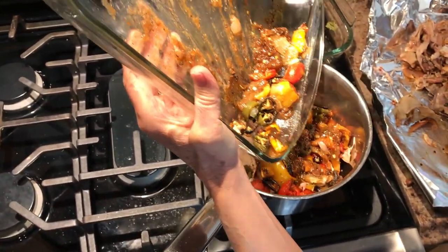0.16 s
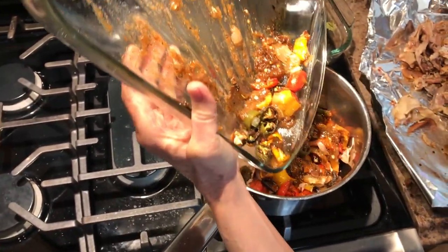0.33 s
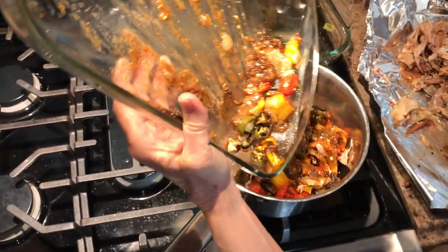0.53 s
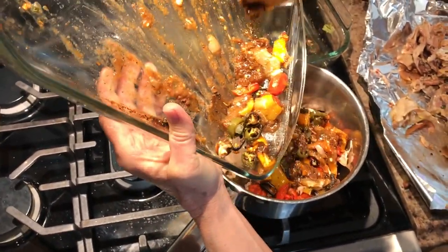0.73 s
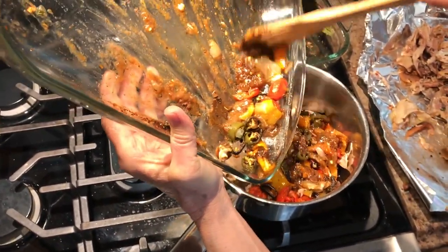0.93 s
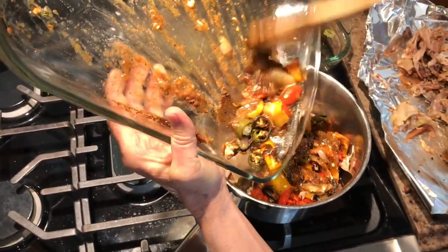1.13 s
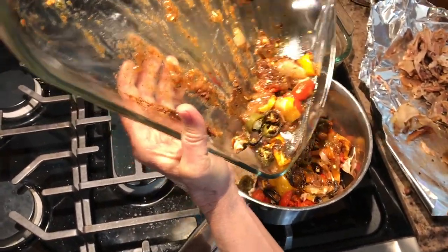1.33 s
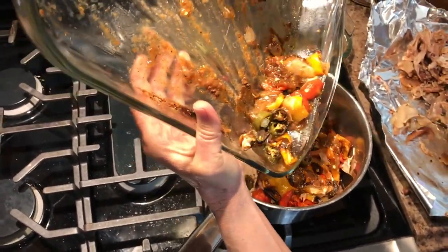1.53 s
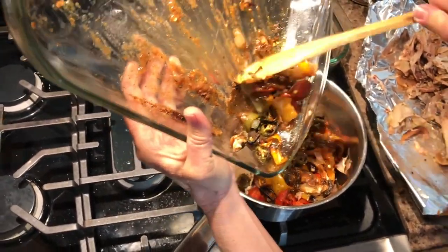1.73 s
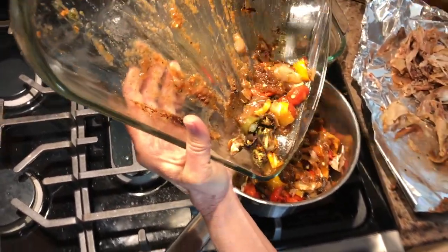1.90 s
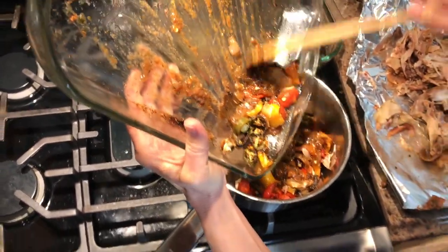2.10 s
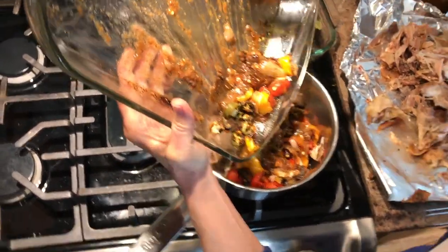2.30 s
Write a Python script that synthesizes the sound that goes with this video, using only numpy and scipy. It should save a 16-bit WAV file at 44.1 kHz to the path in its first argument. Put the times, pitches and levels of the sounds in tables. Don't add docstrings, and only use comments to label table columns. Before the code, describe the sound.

Wooden spoon scraping a glass dish, with three ringing knocks and sticky wet smears in a quiet kitchen

```python
import sys
import numpy as np
from scipy import signal
from scipy.fft import rfft, irfft, next_fast_len
from scipy.io import wavfile
from scipy.ndimage import uniform_filter1d

SR = 44100
rng = np.random.default_rng(int(sys.argv[2]) if len(sys.argv) > 2 else 0)


def int16_out(signal):
    q = np.round(np.clip(np.atleast_2d(signal).T, -1, 1) * 32767)
    wavfile.write(sys.argv[1], SR, q.astype(np.int16))


def boost_factor(decibels):
    exponent = np.asarray(decibels, float) / 20
    return 10 ** exponent


N = 103635

# pitch_hz, density_db (per Hz)
AIR = [(25, -34), (50, 1.5), (90, -12), (300, -15.5), (800, -18), (3000, -32), (10000, -40), (16000, -38)]
AIR_DB = -68
ROOM_T60_S, ROOM_DB, WALL_CUT_HZ = .3, -22, 4000

# pitch_hz, level_db
MIC = [(60, -1), (4500, -0.5), (5000, 0), (9000, -0.5), (10600, -3), (12500, 1.5), (15000, 4)]
NEAR_LOW_HZ = 134
TOP_HZ, TOP_DB = 15650, -25

# start_s, length_s, level_db, centre_hz
SMEARS = [(0.003, 0.012, -64, 11000), (1.505, .12, -72, 7000), (1.625, .04, -70, 7000),
          (0.31, 0.013, -58, 9000), (.39, 0.04, -64.5, 8800), (0.48, 0.021, -51.5, 11900),
          (0.532, 0.03, -64, 12600), (0.572, 0.056, -73.5, 10700), (0.632, 0.061, -61, 9000),
          (0.748, 0.028, -61.5, 8000), (0.913, 0.058, -62, 5960), (0.991, 0.044, -66.5, 9800),
          (1.014, 0.0098, -52, 11100), (1.02, 0.053, -88, 8850), (1.08, 0.04, -66, 5900),
          (1.124, 0.015, -83, 10000), (1.19, 0.016, -74, 10000), (1.222, 0.031, -72.5, 11100),
          (1.66, 0.046, -65, 8000), (1.755, 0.065, -72, 7040), (2.112, 0.063, -69.5, 8050),
          (2.175, 0.04, -61, 5030), (2.232, 0.013, -70, 9900), (2.282, 0.014, -67, 7040)]
SMEAR_EDGE_S, SMEAR_TAIL, SMEAR_WIDTH_OCTAVES = .0015, 0.27, 1.3
SMEAR_GRAINS_PER_S, SMEAR_SPREAD_DB, SMEAR_CYCLES = 6400, 2.2, 30
# start_s, peak_db, pitch_hz
POPS = [(.003, -40, 9500), (.0223, -54, 13500), (.398, -52, 8700), (.428, -58, 7000), (.6025, -54, 6300),
        (.84, -58, 11700), (1.045, -56, 13000), (1.058, -56, 4000), (1.149, -51, 13500), (1.129, -56, 8400),
        (1.222, -53, 8500), (1.248, -53, 13500), (1.2865, -59, 7000), (1.4057, -64, 3010),
        (1.7604, -52, 4200), (1.779, -52, 4000), (1.8931, -62, 14500), (1.9215, -59, 11500),
        (2.0403, -63, 12300), (2.1161, -55, 3500), (1.106, -52, 9000), (1.2, -48, 10000),
        (.314, -61, 13000), (.5372, -48, 14100), (.5432, -43, 14300), (.569, -59, 13100), (.635, -57, 8800),
        (0.652, -60, 10330), (0.735, -64, 8900), (0.764, -41, 4380), (.786, -44.5, 14600),
        (0.9328, -39, 3460), (1.006, -52, 8000), (1.071, -47, 6200), (1.074, -43, 5700), (1.078, -45, 5650),
        (1.106, -42, 5700), (1.124, -43.5, 12000), (1.14, -48, 9730), (1.189, -45, 12000),
        (1.2, -45.5, 7450), (1.227, -46.5, 9400), (1.239, -55, 4500), (1.6626, -44, 4400),
        (1.799, -48.5, 15000), (2.195, -45, 7000), (2.2222, -45.5, 11500), (2.281, -40, 5340),
        (2.286, -44.5, 4000), (2.2927, -43, 7700), (2.299, -44.5, 14400)]
POP_T60_S, POP_WIDTH_OCTAVES = .0055, 0.37
THREAD_PITCHES, THREAD_HISS_DB, CLUMP_S, CLUMP_DB = 16, -5, 0.0098, 3.5

# start_s, level_db
BUMPS = [
    (.9145, -50),
    (0.758, -54),
    (.487, -55.5),
    (1.018, -58),
    (.69, -58),
    (.935, -50),
    (.655, -55),
    (1.56, -58),
    (2.19, -52),
    (.303, -52),
]
BUMP_HZ, BUMP_T60_S = 222, 0.042

# start_s, peak_s, end_s, level_db, pitch_hz
SINGS = [(.57, .595, .64, -68, 1034), (.63, .685, .76, -56, 1034), (.755, .772, .87, -55, 1034),
         (1.783, 1.802, 1.93, -54.5, 1030), (2.172, 2.187, 2.205, -57, 740), (1.66, 1.72, 1.82, -62, 755),
         (1.635, 1.66, 1.7, -58, 2270), (1.785, 1.81, 1.85, -62, 2110), (1.68, 1.705, 1.74, -62, 2960),
         (1.58, 1.63, 1.66, -63, 1034), (2.08, 2.14, 2.165, -54, 1030), (2.11, 2.152, 2.17, -54, 1625),
         (2.09, 2.115, 2.145, -55, 725), (2.24, 2.26, 2.3, -65, 740), (.93, .945, .975, -58, 1497),
         (.3, .36, .47, -66, 1600), (.605, .615, .64, -62, 2060), (.752, .766, .782, -58, 4380),
         (1.625, 1.68, 1.8, -57, 1580), (1.65, 1.664, 1.69, -59, 4400), (1.77, 1.785, 1.815, -65, 5600),
         (.57, .59, .68, -68, 2768)]
SING_WAVER_DB, SING_WAVER_S = 2.2, .008

# start_s, peak_s, end_s, level_db, rasp_centre_hz
DRAGS = [(0.26, 0.307, 0.4, -58.5, 455), (0.34, 0.398, 0.533, -66, 1460), (0.46, .49, 0.64, -63, 1208),
         (0.547, 0.626, 0.61, -57.5, 2280), (0.598, 0.654, 0.77, -57.5, 1110),
         (0.746, 0.756, .79, -52.5, 1200), (.911, 0.914, 0.95, -56, 686), (0.934, 0.934, 0.99, -55.5, 1200),
         (1.012, 1.016, 1.05, -57, 1400), (1.028, 1.077, 1.158, -67, 1530), (1.415, 1.494, 1.84, -69, 920),
         (1.5, 1.61, 1.59, -69, 710), (1.585, 1.66, 1.916, -54, 1850), (1.76, 1.784, 1.88, -64, 1900),
         (2.05, 2.17, 2.215, -56, 1100), (2.17, 2.225, 2.31, -64, 1100)]
DRAG_MODE_DB = [-17, -14.5, -14.5, -5.5, -7, -7.5, -10, -10, -7, -6, -8, -14, -14, -10.5]
SLIPS_PER_S, SLIP_SPREAD_DB, RASP_CYCLES, RASP_WIDTH_OCTAVES = 14000, 2, 34, 1.27
DRAG_DAMPING, DRAG_RING_DB = 0.47, 2.5
DRAG_RING_FALL_DB = 4.1

DISH_HZ = [243, 345, 519, 738, 765, 1034, 1497, 1552, 1627, 2270, 2768, 2960, 3255, 4343]
# t60_s, spot_1_db, spot_2_db, spot_3_db
DISH = [(0.16, -28, -23, -23), (0.041, -19, -14.5, -7.5), (0.053, -17.5, -18.5, -15),
        (0.12, -18, -16.5, -7), (0.049, -15, -14.5, 0.1), (0.16, 0.5, -3, -7), (0.058, -10, -21, -19),
        (0.15, -12.5, -21, -27), (0.11, -15.5, -12, -7), (0.1, -19.5, -17.5, -14),
        (0.095, -28.5, -18, -32.5), (0.06, -24, -10, -25), (0.058, -20, -20, -25), (0.054, -47, -13.5, -35)]
SPOT_RING = [
    1.01,
    .75,
    .55,
]
TWIN_DB, TWIN_LONGER, TWIN_HZ = -21.5, 3.8, 6
# pitch_hz, t60_s, spot_1_db, spot_2_db, spot_3_db
SPOON = [(196, 0.04, -13, -14, -12), (1195, 0.013, -26, -4.5, -16), (1078.4, 0.046, -2, -8, -13),
         (391, 0.023, -9.5, -9.5, -11.5), (626, 0.027, -15, -7.5, -11), (1755, 0.044, -22, -10, -30),
         (2180, 0.033, -18, -12.5, -25), (3760, .028, -33, -10.5, -27), (5630, 0.063, -38, -1.5, -32),
         (6730, 0.0099, -38, -3, -31), (3025, .04, -24, -30, -30), (850, .03, -18, -20, -14)]
# level_db, t60_s, centre_hz
CRACKS = [
    (-27, 0.089, 3300),
    (0, 0.027, 2640),
    (-28, 0.017, 6400),
]
# start_s, level_db, softness_cut_hz, thud_db
KNOCKS = [(0.2302, -25, 3260, 5), (.2336, -22.5, 2450, -13), (.6671, -56, 2000, .1),
          (0.6545, -58, 2000, .1), (.7551, -58, 2500, 7), (.7625, -61, 2500, 5), (1.7979, -62, 1360, -6),
          (1.4963, -36.5, 9100, .1), (1.4978, -35, 7000, .1), (.9331, -57, 6000, .1),
          (2.0677, -48, 2030, .1), (2.0688, -27, 2290, 1.5)]
KNOCK_SPOT = [0, 0, 2, 2, 2, 2, 0, 1, 1, 1, 2, 2]
THUD_BELOW_HZ, BOUNCE_S = 700, .006


def rms_one(x):
    return x / np.sqrt(np.mean(x ** 2) + 1e-20)


def ring(clicks, hz, t60):
    radius = 10 ** (-3 / (t60 * SR))
    w = 2 * np.pi * hz / SR
    return signal.lfilter([0, np.sin(w)], [1, -2 * radius * np.cos(w), radius ** 2], clicks + 1e-18)


def band(x, hz, octaves):
    edges = np.clip([hz * 2 ** -octaves, hz * 2 ** octaves], 20, .45 * SR)
    return signal.sosfilt(signal.butter(1, edges, "band", fs=SR, output="sos"), x)


def butter_two(x, hz, kind="low"):
    return signal.sosfilt(signal.butter(2, hz, kind, fs=SR, output="sos"), x)


def swell(start, peak, end, power):
    return np.interp(np.arange(N) / SR, [start, peak, end], [0, 1, 0]) ** power


def grains(per_s, spread_db):
    sizes = boost_factor(spread_db * np.minimum(rng.exponential(1, N), 5)) * rng.choice([-1, 1], N)
    return rms_one(sizes * (rng.random(N) < per_s / SR))


def fizz(low_hz, high_hz, per_s, spread_db, cycles):
    out = boost_factor(THREAD_HISS_DB) * rng.standard_normal(N)
    for hz in np.geomspace(low_hz, high_hz, num=THREAD_PITCHES):
        drift = uniform_filter1d(rng.standard_normal(N), int(CLUMP_S * SR))
        clumps = boost_factor(CLUMP_DB * rms_one(drift))
        snaps = ring(clumps * grains(per_s / THREAD_PITCHES, spread_db), hz, cycles / hz)
        out += np.sqrt(hz / high_hz / 4) * rms_one(snaps)
    return rms_one(out)


def room_air():
    hz, db = np.transpose(AIR)
    grid = np.maximum(np.arange(N // 2 + 1) * SR / N, 1)
    gain = boost_factor(np.interp(np.log(grid), np.log(hz), db))
    return boost_factor(AIR_DB) * rms_one(irfft(rfft(rng.standard_normal(N)) * gain, N))


def kitchen(x):
    size = next_fast_len(N + SR)
    z = np.exp(-2j * np.pi * np.arange(size // 2 + 1) / size)
    dull = np.exp(-2 * np.pi * WALL_CUT_HZ / SR)
    wall = (1 - dull) / (1 - dull * z)
    response = 0
    for k, lag in enumerate((rng.uniform(.008, .035, 8) * SR).astype(int)):
        loop = boost_factor(-60 * lag / SR / ROOM_T60_S) * wall * z ** lag
        response = response + (-1) ** k * loop / (1 - loop)
    return irfft(rfft(x, size) * response, size)[:N]


def smears():
    out, t = np.zeros(N + SR), np.arange(SR // 5) / SR
    snaps = fizz(2250, 12500, SMEAR_GRAINS_PER_S, SMEAR_SPREAD_DB, SMEAR_CYCLES)
    for s, length, db, hz in SMEARS:
        i = int(s * SR)
        times = [0, SMEAR_EDGE_S, length, length * (1 + SMEAR_TAIL) + SMEAR_EDGE_S]
        shape = np.interp(t, times, [0, 0.64, 0.23, 0.058])
        film = band(np.resize(snaps[i:], len(t)), hz, SMEAR_WIDTH_OCTAVES)
        out[i:i + len(t)] += boost_factor(db) * shape * 2 * film
    return out[:N]


def pops():
    out, t = np.zeros(N + SR), np.arange(900) / SR
    for s, db, hz in POPS:
        i = int(s * SR)
        pop = rng.standard_normal(len(t)) * boost_factor(-60 * t / POP_T60_S)
        for _ in range(2):
            pop = band(pop, hz, POP_WIDTH_OCTAVES)
        out[i:i + len(t)] += boost_factor(db) * pop / np.abs(pop).max()
    return out[:N]


def bumps():
    clicks = np.zeros(N)
    s, db = np.transpose(BUMPS)
    clicks[(s * SR).astype(int)] = boost_factor(db)
    soft = signal.sosfilt(signal.butter(1, 3 * BUMP_HZ, fs=SR, output="sos"), clicks)
    return ring(soft, BUMP_HZ, BUMP_T60_S)


def singing():
    t, drift = np.arange(N) / SR, rng.standard_normal(N)
    for _ in range(2):
        drift = uniform_filter1d(drift, int(SING_WAVER_S * SR))
    tones = np.zeros(N)
    for start, peak, end, db, hz in SINGS:
        tones += boost_factor(db + 3) * swell(start, peak, end, 1.5) * np.sin(2 * np.pi * hz * t)
    return boost_factor(SING_WAVER_DB * rms_one(drift)) * tones


def drags():
    strokes = [boost_factor(db) * swell(start, peak, end, 2.53) for start, peak, end, db, _ in DRAGS]
    centres = np.array([row[4] for row in DRAGS])
    slips = grains(SLIPS_PER_S, SLIP_SPREAD_DB)
    rasp = fizz(191.5, 8450, SLIPS_PER_S, SLIP_SPREAD_DB, RASP_CYCLES)
    shake, scrape = np.zeros(N), np.zeros(N)
    for k, (hz, mode, db) in enumerate(zip(DISH_HZ, DISH, DRAG_MODE_DB)):
        t60 = mode[0] * DRAG_DAMPING
        push = boost_factor(-DRAG_RING_FALL_DB * np.abs(np.log2(hz / centres))) @ strokes
        own_slips = np.roll(slips, 997 * k)
        shake += boost_factor(db) / np.std(ring(slips, hz, t60)) * ring(own_slips * push, hz, t60)
    for stroke, hz in zip(strokes, centres):
        colour = band(band(rasp, hz, RASP_WIDTH_OCTAVES), hz, RASP_WIDTH_OCTAVES)
        scrape += stroke * rms_one(colour)
    return boost_factor(DRAG_RING_DB) * shake + scrape


def dish_modes(click, share):
    modes = []
    for k, (hz, mode) in enumerate(zip(DISH_HZ, DISH)):
        t60 = mode[0] * share
        twin = boost_factor(TWIN_DB) * ring(click, hz + TWIN_HZ, t60 * TWIN_LONGER)
        modes.append((-1) ** k * (ring(click, hz, t60) + twin))
    return np.array(modes)


def knocks():
    out, t = np.zeros(N + SR), np.arange(SR // 2) / SR
    click = 1. * (t == 0)
    dish, spoon = np.array(DISH), np.array(SPOON)
    glass = [dish_modes(click, share) for share in SPOT_RING]
    wood = np.array([(-1) ** k * ring(click, mode[0], mode[1]) for k, mode in enumerate(SPOON)])
    for (s, db, soft_hz, thud_db), spot in zip(KNOCKS, KNOCK_SPOT):
        body = boost_factor(spoon[:, 2 + spot] + thud_db * (spoon[:, 0] < THUD_BELOW_HZ)) @ wood
        stopped = any(0 < later[0] - s < BOUNCE_S for later in KNOCKS)
        if not stopped:
            body = body + boost_factor(dish[:, 1 + spot]) @ glass[spot]
        crack_db, t60, crack_hz = CRACKS[spot]
        crack = band(boost_factor(crack_db - 60 * t / t60) * rng.standard_normal(len(t)), crack_hz, 1)
        i = int(s * SR)
        out[i:i + len(t)] += boost_factor(db) * (butter_two(body, soft_hz) + crack)
    return out[:N]


def scene():
    sources = smears() + pops() + bumps() + singing() + drags() + knocks()
    near = butter_two(sources, NEAR_LOW_HZ, "high")
    return (room_air() + boost_factor(ROOM_DB) * kitchen(near) + near)[None]


def band_limit(x):
    return signal.sosfilt(signal.butter(12, 16660, fs=SR, output="sos"), x)


def record(dry):
    hz = np.arange(N // 2 + 1) * SR / N
    mic_hz, mic_db = np.transpose(MIC)
    response_db = np.interp(hz, mic_hz, mic_db) + TOP_DB * (hz > TOP_HZ)
    mix = irfft(rfft(dry) * boost_factor(response_db), N)
    return band_limit(mix)


dry = scene()
out = record(dry)
int16_out(out)
```